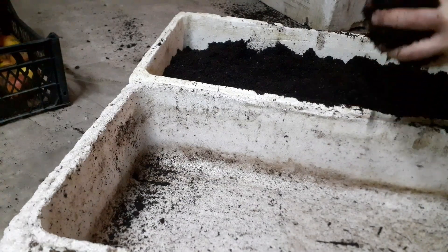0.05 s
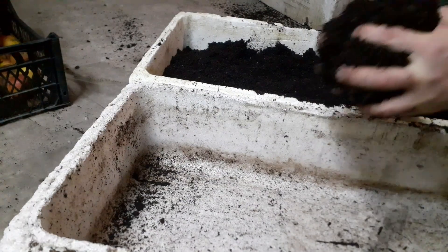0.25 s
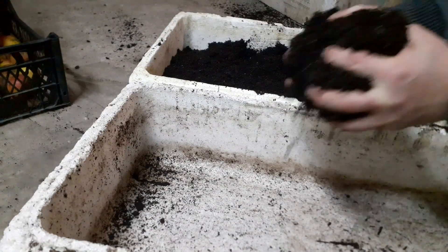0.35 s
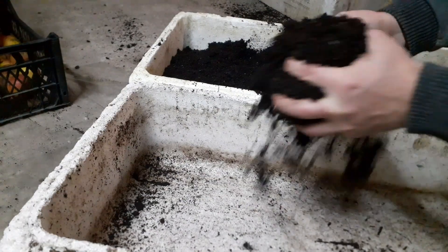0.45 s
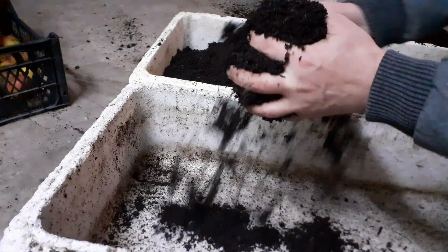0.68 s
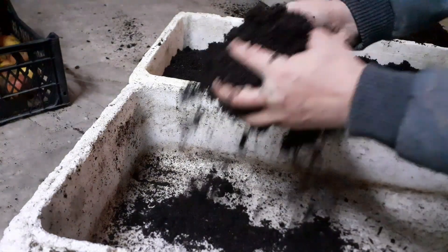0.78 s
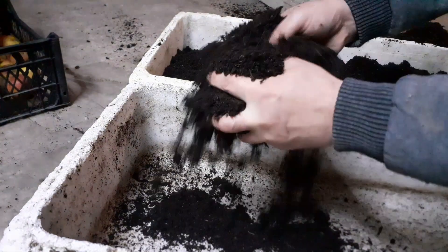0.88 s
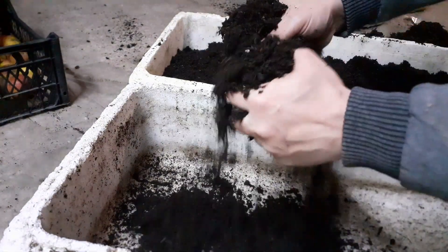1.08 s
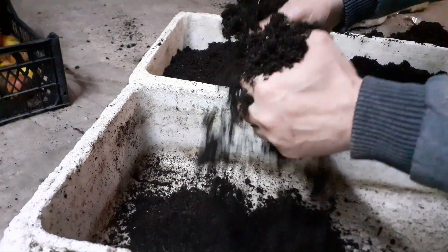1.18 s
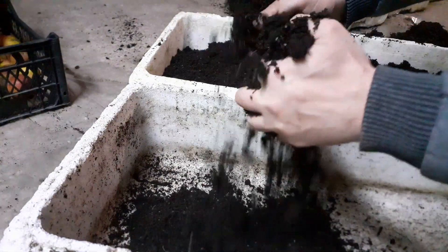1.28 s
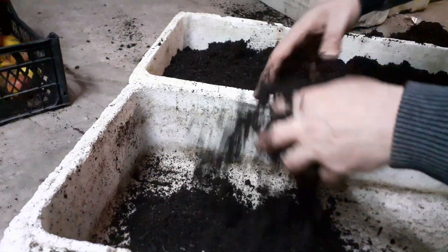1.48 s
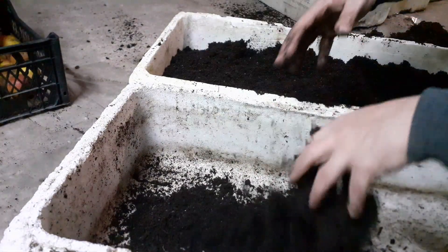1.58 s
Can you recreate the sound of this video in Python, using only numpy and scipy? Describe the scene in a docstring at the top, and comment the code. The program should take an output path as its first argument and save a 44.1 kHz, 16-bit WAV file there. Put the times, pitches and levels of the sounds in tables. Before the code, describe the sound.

Handfuls of moist crumbly planting fibre drop into an empty foam box with crackly, hollow patter

```python
"""Coir crumbled into a foam box

Handfuls of moist coir are crumbled over an empty foam box in a small room, two microphones close by.
Clumps knock as damped sines on the foam floor, and the box booms and rings in resonances and swelling tones.
A shower of random crumbs patters between them; the scattering fibres hiss as noise made of tiny clicks.
Behind it lie a short room tail and quiet air."""
import sys
import numpy as np
from scipy import signal
from scipy.fft import rfft, irfft, next_fast_len
from scipy.io import wavfile
from scipy.ndimage import uniform_filter1d, map_coordinates

SR = 44100
rng = np.random.default_rng(int(sys.argv[2]) if len(sys.argv) > 2 else 0)


def voltage_ratio(level):
    """Linear amplitude factor for a level in decibels (scalar or array-like)."""
    return 10 ** (np.asarray(level, float) / 20)


def materialize(psi):
    """Save the field psi as 16-bit PCM at rate SR to the path in sys.argv[1].

    A 1-D psi becomes a single channel; in a 2-D psi each row is a channel.
    """
    bounded = np.clip(np.atleast_2d(psi).T, -1, 1)
    quanta = np.round(bounded * 32767).astype(np.int16)
    wavfile.write(sys.argv[1], SR, quanta)


N = 72765  # length in samples

CONTACT_S, BREAKUP_S = 0.0015, 0.0044  # delay of the knock, spread of the pieces after it
KNOCK_CYCLES, COVER_PER_S = 9.25, 0.4  # cycles to fall 60 dB at 0 s; the growing bed of coir shortens them
KNOCK_DB, PIECE_DB, PIECE_PITCH = -4.5, -16, 0.3  # pitch spread in log units
PUSH_LAG_S, BOOM_DB = 0.002805, 31.5
SCATTER_LEAD_S, SCATTER_RISE_S, SCATTER_T60_S, SCATTER_DB = 0.0029, 0.0051, 0.025, 7.5
# Clumps landing on the floor of the box. Each row: start in seconds, relative level in dB, knock pitch in Hz,
# push on the box relative to that level in dB, fibre hiss relative to it in dB.
CLUMP_LANDINGS = [(0.018, -56, 1490, -35, 8), (0.039, -54, 990, 3, -30), (0.048, -37.5, 1490, -10, -13),
                  (0.06, -45.5, 667, -21, 2), (0.108, -50, 790, 1, 2.5), (0.171, -46, 1840, -21, -3.5),
                  (0.198, -53.5, 1150, -26, -2.5), (0.217, -21.5, 1040, -17, -28),
                  (0.222, -20.5, 840, -36, -27), (0.228, -30, 2530, 6.5, -8), (0.305, -26.5, 714, -6, -21),
                  (0.314, -24, 860, 10, -12), (0.342, -22.5, 1930, 4, -9.5), (0.361, -22, 865, -12, -14),
                  (0.388, -26.5, 1980, -22, -11), (0.408, -27, 815, -6, -13.5),
                  (0.422, -30, 2620, -10, -9.5), (0.433, -34.5, 2000, -16, -7.5),
                  (0.468, -20.5, 2690, -17, -20.5), (0.469, -22, 1350, -31, -30),
                  (0.502, -19, 1090, -23, -19.5), (0.533, -27, 1870, -27, -15),
                  (0.545, -28, 2850, -19, -10), (0.549, -20.5, 1020, -9, -21), (0.572, -25, 657, 5, -11),
                  (0.581, -14.5, 740, -28, -37), (0.59, -15, 970, 4.5, -40), (0.598, -21.5, 746, 8, -33),
                  (0.614, -11.5, 770, -2.5, -44), (0.629, -19.5, 745, -21, -17.5),
                  (0.655, -12, 1030, -7.5, -19.5), (0.69, -20, 840, 4.5, -4), (0.718, -25.5, 920, -10, -4),
                  (0.743, -12, 1050, -17, -21), (0.755, -6.5, 1080, -7, -45), (0.761, -29, 1560, -26, 4),
                  (0.781, -21.5, 556, -4, -12), (0.79, -18.5, 1110, -22, -18), (0.848, -11, 820, -8, -34),
                  (0.864, -28, 600, 1, -15), (0.899, -14, 950, -34, -21), (0.912, -23, 856, -11, -23),
                  (0.951, -22, 680, -14, -9.5), (0.964, -43, 720, 5.5, -35), (1.056, -13, 1090, -17, -25),
                  (1.065, -20, 1520, -27, -13), (1.102, -14, 1200, -7, -28),
                  (1.135, -17.5, 910, -19, -12.5), (1.158, -10.5, 1160, -25, -27.5),
                  (1.201, -23.5, 1010, 2, -19), (1.223, -27, 1460, -20, -16.5),
                  (1.23, -16.5, 1220, -32, -34), (1.239, -19, 1230, -24, -24), (1.253, -28, 942, -6, -25),
                  (1.279, -13.5, 1090, -19, -26.5), (1.287, -29, 1220, -29, -29),
                  (1.307, -16.5, 900, -31, -20), (1.323, -16.5, 1060, -4.5, -19),
                  (1.345, -14, 1300, -11.5, -24), (1.361, -23, 1200, -3, -10.5), (1.376, -31, 587, 8.5, -6),
                  (1.433, -30.5, 566, -7, -6), (1.453, -32, 1180, -14, -17), (1.507, -30, 1940, -3, -18.5),
                  (1.548, -55, 800, -10, -13), (1.565, -31, 984, -7, -43), (1.604, -46.5, 1170, -5, 1),
                  (1.62, -46, 947, -18, 1.5)]


def clumps():
    """Each clump knocks, breaks into four weaker pieces, pushes the box and sprays fibres."""
    s, db, hz, boom_db, hiss_db = np.transpose(CLUMP_LANDINGS)
    s = s + CONTACT_S
    r = rng.standard_normal((len(s), 4, 5))
    place = np.tanh(r[:, 0, 0])
    cycles = KNOCK_CYCLES * np.exp(-COVER_PER_S * s)[:, None]
    knock = grains(s, hz, db + KNOCK_DB, cycles, place)
    for k in range(1, 5):
        piece_s = s + BREAKUP_S * abs(r[:, 1, k])
        piece_hz = np.clip(hz * np.exp(PIECE_PITCH * r[:, 2, k]), 300, 6000)
        piece_db = db + PIECE_DB + 3 * r[:, 3, k]
        knock = knock + grains(piece_s, piece_hz, piece_db, cycles, np.tanh(r[:, 0, k]))
    knock = foam(knock)

    push, spray = np.zeros(N), np.zeros(N)
    np.add.at(push, ((s + PUSH_LAG_S) * SR).astype(int), voltage_ratio(db + boom_db + BOOM_DB))
    # the spray is a power, hence the doubled dB
    np.add.at(spray, ((s - SCATTER_LEAD_S) * SR).astype(int), voltage_ratio(2 * (db + hiss_db + SCATTER_DB)))
    t = np.arange(SR // 8) / SR
    shape = (1 - np.exp(-t / SCATTER_RISE_S)) * voltage_ratio(-120 * t / SCATTER_T60_S)
    spray_level = np.sqrt(abs(signal.fftconvolve(spray, shape)[:N]))
    return knock + box(push), spray_level * fizz(count=1500, spiky_db=3.0)


SPREAD_S, PAN_DB = 0.00008, 2.5  # most shift either way at each microphone
SAG_CYCLES = 0.35  # extra phase in cycles gained while the pitch sags


def grains(s, hz, db, cycles, place, size=500):
    """Damped sines whose pitch sags as the contact spreads; place (-1..1) sets time and level per microphone."""
    out = []
    for ear in (1, -1):
        at = (s + ear * place * SPREAD_S + 0.001) * SR  # 1 ms of margin, cut off below
        k = np.arange(size) + at.astype(int)[:, None]
        t = np.maximum(k - at[:, None], 0) / SR * hz[:, None]  # time in cycles
        level = voltage_ratio(db[:, None] + ear * PAN_DB * place[:, None] - 60 * t / cycles)
        wave = level * np.sin(2 * np.pi * (t + SAG_CYCLES * (1 - np.exp(-t))))
        out.append(np.bincount(k.ravel(), wave.ravel(), N + SR)[SR // 1000:][:N])
    return np.array(out)


FOAM_DB, FOAM_LOW_HZ = -6.5, 416  # resonance trim, low cut
# The foam floor under small hits. Each row: centre in Hz, width in Hz, relative level in dB.
FOAM_PEAKS = [(623, 110, 7), (740, 11, 4), (793, 300, 6), (1180, 74, 4), (1156, 240, 5), (1560, 330, -11),
              (2040, 220, 11.5)]


def foam(x):
    """Small hits ring the foam floor, which radiates little bass."""
    ring = resonances(FOAM_PEAKS)
    low_cut = highpass(FOAM_LOW_HZ, order=3)
    return filtered(x, lambda f: (1 + voltage_ratio(FOAM_DB) * ring(f)) * low_cut(f))


PUSH_S = 0.0017  # softness of a push; longer is duller
# The whole box booming. Each row: centre in Hz, width in Hz, relative level in dB.
BOX_PEAKS = [(152, 77, -5.5), (201.3, 40.5, 0.5), (288.4, 9.8, 8), (360, 16.2, 2.5), (420, 9.5, -1.5)]


def box(push):
    """The resonances of the whole box, driven through a soft two-stage low-pass."""
    ring = resonances(BOX_PEAKS)
    return filtered(push, lambda f: ring(f) / (1 + 1j * f * PUSH_S) ** 2)


WALL_HZ, WALL_RISE_S, WALL_T60_S = (298.6, 355.8), 0.0031, 0.085
HIGH_WALL_HZ, HIGH_WALL_DB, HIGH_WALL_T60_S = 735, -18, 0.13  # dB: the high tone under each wall boom
# Landings that set the two wall tones ringing. Each row: start in seconds, level in dB,
# share of power in the upper tone from 0 to 1.
WALL_BOOMS = [(0.052, -45, 0.2), (0.088, -47.5, 1), (0.102, -43.5, 0.94), (0.228, -29, 0.74),
              (0.253, -34.5, 0.83), (0.312, -33.5, 0.2), (0.324, -28, 0.93), (0.357, -27.5, 1),
              (0.421, -30, 0.75), (0.444, -36, 0.37), (0.504, -39.5, 0), (0.554, -32, 0.35),
              (0.576, -17, 0.35), (0.597, -13, 0.2), (0.619, -17, 0.35), (0.646, -22.5, 0.4),
              (0.708, -16, 0.49), (0.745, -21, 0.4), (0.758, -20.5, 0.9), (0.784, -18.5, 0.02),
              (0.853, -17.5, 0.66), (0.9, -25, 1), (0.924, -36, 0), (0.952, -16.5, 0), (0.963, -19, 0),
              (1.085, -42, 0.5), (1.101, -23, 0), (1.136, -21, 0.03), (1.164, -30, 0.6), (1.205, -31, 0.2),
              (1.243, -31, 0.04), (1.279, -32, 0.5), (1.31, -26.5, 0.98), (1.343, -26.5, 0),
              (1.434, -55, 0.7), (1.515, -40, 0.53), (1.563, -47, 0.9), (1.619, -41, 0.1)]
# Landings near a wall that ring its high tone. Each row: start in seconds, level in dB.
HIGH_WALL_RINGS = [(0.064, -46), (0.236, -38.5), (0.262, -40), (0.316, -34.5), (0.578, -19), (0.66, -38),
                   (0.952, -32)]


def wall_tones():
    """Landings split their power between two wall tones and sound a weaker high one."""
    s, db, share = np.transpose(WALL_BOOMS)
    share = np.clip(share, 0.02, 0.98)
    walls = ringing(s, db + HIGH_WALL_DB, HIGH_WALL_HZ, WALL_RISE_S, HIGH_WALL_T60_S)
    for hz, part in zip(WALL_HZ, (1 - share, share)):
        walls = walls + ringing(s, db + 10 * np.log10(part), hz, WALL_RISE_S, WALL_T60_S)
    near_s, near_db = np.transpose(HIGH_WALL_RINGS)
    return walls + ringing(near_s, near_db, HIGH_WALL_HZ, WALL_RISE_S, HIGH_WALL_T60_S)


DEEP_HZ, DEEP_RISE_S, DEEP_T60_S = 114, 0.014, 0.18
# Heavy landings that shake the whole floor of the box. Each row: start in seconds, level in dB.
FLOOR_THUDS = [(0.078, -59.5), (0.22, -69), (0.318, -38), (0.386, -48.5), (0.491, -55), (0.586, -53),
               (0.616, -38), (0.701, -27), (0.744, -22), (0.799, -32.5), (0.853, -41), (0.957, -20.5),
               (0.994, -25.5), (1.094, -25.5), (1.128, -42), (1.199, -38), (1.292, -39), (1.363, -28),
               (1.48, -37.5), (1.561, -32.5), (1.61, -48)]


def floor_thuds():
    """The whole floor swells slowly into one deep tone under each heavy landing."""
    s, db = np.transpose(FLOOR_THUDS)
    return ringing(s, db, DEEP_HZ, DEEP_RISE_S, DEEP_T60_S)


DETUNE = 0.03  # random pitch spread in log units
WANDER_DB, WANDER_PER_CYCLE = 4, 0.3  # slow random wander of the ringing level


def ringing(s, db, hz, rise_s, t60_s):
    """One tone swelling and dying after each landing, each with a small random detuning."""
    t = np.maximum(np.arange(N) / SR - s[:, None], 0)
    phase = 2 * np.pi * rng.random((len(s), 1))
    tune = np.exp(DETUNE * rng.standard_normal((len(s), 1)))
    knots = np.arange(N) / SR * hz * WANDER_PER_CYCLE
    wander = map_coordinates(rng.standard_normal(int(knots[-1]) + 4), [knots])
    level = voltage_ratio(db[:, None] - 60 * t / t60_s) * (1 - np.exp(-t / rise_s))
    tones = level * np.sin(2 * np.pi * tune * hz * t + phase)
    return voltage_ratio(WANDER_DB * wander) * np.sum(tones, 0)


CRUMB_HZ, CRUMB_PITCH, CRUMB_CYCLES = 1020, 0.51, 5  # middle pitch, log spread, cycles to fall 60 dB
CRUMB_SIZE_DB = 3.5  # spread of crumb levels
PATTER_DB, RUMBLE_DB, HISS_DB = -5, -4, -0.5  # trims of the three layers
# The crumb shower, drawn as lines between rows. Each row: time in seconds, then the relative levels in dB
# of the patter, the box hum and the fibre hiss.
SHOWER_LEVELS = [(0.0,-69,-76,-79), (0.068,-50.5,-60.5,-55), (0.149,-66,-82,-80), (0.206,-63,-65,-47.5),
                 (0.22,-32,-72,-78), (0.227,-60,-69,-47), (0.238,-44,-56,-56), (0.3,-66,-44.5,-55.5),
                 (0.316,-32,-42,-48.5), (0.464,-46.5,-47.5,-52), (0.556,-35,-63,-49), (0.579,-18,-40,-31),
                 (0.634,-25,-29,-36), (0.735,-30,-30,-36), (0.757,-18.5,-32,-33.5), (0.77,-25,-25,-35),
                 (0.84,-43,-35.5,-44), (0.848,-30,-20,-39), (0.864,-31,-44,-41), (0.941,-34.5,-38,-42.5),
                 (0.95,-26,-38.5,-34), (1.022,-48,-38.5,-53), (1.051,-37,-39,-43.5), (1.063,-25.5,-37,-43),
                 (1.079,-36.5,-26.5,-39.5), (1.116,-32,-44,-36), (1.167,-28.5,-33.5,-41),
                 (1.191,-48,-31,-51.5), (1.238,-37,-42,-52), (1.271,-45.5,-51,-56), (1.284,-34.5,-64,-42),
                 (1.399,-40.5,-44,-48.5), (1.47,-56,-48.5,-56), (1.534,-48.5,-60,-55), (1.56,-52,-40,-49),
                 (1.569,-37.5,-36.5,-40), (1.586,-50,-43.5,-57), (1.65,-52,-45,-44.5)]


def shower(count=1700):
    """Random crumbs patter on the foam, noise keeps the box humming and fibres hiss."""
    at, *columns = np.transpose(SHOWER_LEVELS)
    patter_db, hum_db, hiss_db = [np.interp(np.arange(N) / SR, at, c) for c in columns]
    r, u = rng.standard_normal((count, 2)), rng.random((count, 2))
    crumb_s = u[:, 0] * N / SR
    crumb_hz = np.clip(CRUMB_HZ * np.exp(CRUMB_PITCH * r[:, 0]), 300, 9000)
    crumb_db = -CRUMB_SIZE_DB * np.log(u[:, 1] + 0.033)  # many small, few large
    crumbs = grains(crumb_s, crumb_hz, crumb_db, CRUMB_CYCLES, np.tanh(r[:, 1]))
    patter = voltage_ratio(patter_db + PATTER_DB) * unit(foam(crumbs))
    hum = voltage_ratio(hum_db + RUMBLE_DB) * unit(box(rng.standard_normal(N)))
    return patter + hum, voltage_ratio(hiss_db + HISS_DB) * fizz(count=900, spiky_db=1.5)


UNALIKE_HZ = 3740  # the two microphones grow apart up to here
# Colour of the fibre hiss. Each row: frequency in Hz, relative density in dB per Hz.
FIBRE_COLOUR = [(300, -47), (1180, 0.5), (2000, -5.5), (3910, -8), (4340, -8.5), (7440, -14.5),
                (11900, -15.5), (15200, -18), (16000, -28)]


def fizz(count, spiky_db, patchy_db=3):
    """Stereo hiss of rms 1 from very many tiny clicks of uneven size and colour, alike only low down."""
    size = map_coordinates(rng.standard_normal(count + 4), [np.arange(N) * count / N])
    clicks = voltage_ratio(spiky_db * size) * rng.standard_normal((2, N))
    z = signal.stft(clicks, nperseg=128)[2]
    field = uniform_filter1d(rng.standard_normal(z.shape[1:]), size=14, axis=0)
    field = uniform_filter1d(field, size=5, axis=1)
    pair = signal.istft(z * voltage_ratio(patchy_db * unit(field)), nperseg=128)[1][:, :N]

    def colour_and_width(hz):
        turn = np.pi / 4 * np.clip(hz / UNALIKE_HZ, 0, 1)
        return voltage_ratio(along(FIBRE_COLOUR, hz)) * [np.cos(turn), np.sin(turn)]

    mid, side = filtered(pair, colour_and_width)
    return unit(np.array([mid + side, mid - side]))


# Decay of the small room. Each row: frequency in Hz, time to fall 60 dB in seconds.
ROOM_DECAY = [(200, 0.21), (2000, 0.21), (10000, 0.2)]


def room(x):
    """A short tail of decaying noise, different at each microphone."""
    hz, t, z = signal.stft(rng.standard_normal((2, SR // 3)), SR, nperseg=256)
    fade = voltage_ratio(-60 * t / along(ROOM_DECAY, hz)[:, None])
    tail = signal.istft(z * fade, SR, nperseg=256)[1]
    late = np.pad(x, ((0, 0), (150, 0)))  # samples before the tail begins
    return signal.fftconvolve(late, tail / np.linalg.norm(tail[0]), axes=1)[:, :N]


# Colour of the quiet air in the room. Each row: frequency in Hz, relative density in dB per Hz.
AIR_COLOUR = [(24, -41), (40, -35), (312, 3), (1340, -3), (1720, 20), (2000, 1.5), (12100, 2), (16000, 5)]


def air():
    """Steady coloured noise of rms 1, independent at each microphone."""
    return unit(filtered(rng.standard_normal((2, N)), lambda hz: voltage_ratio(along(AIR_COLOUR, hz))))


def resonances(table):
    """Causal response of a set of (Hz, width, dB) peaks with alternating signs."""
    def response(f):
        total = 0
        for k, (centre, width, db) in enumerate(table):
            drag = 1j * f * width
            total = total + (-1) ** k * voltage_ratio(db) * drag / (centre * centre - f * f + drag)
        return total
    return response


def highpass(hz, order):
    """Causal low cut of equal first-order stages, each with its corner at hz / 2."""
    return lambda f: (1j * f / (hz / 2 + 1j * f)) ** order


def filtered(x, response):
    """x times a complex response of frequency."""
    m = next_fast_len(N + SR // 2)
    return irfft(rfft(x, m) * response(np.fft.rfftfreq(m, 1 / SR)), m)[..., :N]


def along(points, hz):
    """(Hz, value) points joined on a log frequency axis."""
    f, v = np.transpose(points)
    return np.interp(np.log(hz + 1), np.log(f + 1), v)


def unit(x):
    """Scaled to rms 1."""
    return x / np.sqrt(np.mean(x ** 2) + 1e-20)


WET_DB, AIR_DB = -12, -66.5


def scene():
    """Clumps, box tones, crumbs and fibres, with the room and its quiet air."""
    hits, spray = clumps()
    tones = wall_tones() + floor_thuds()
    patter, hiss = shower()
    coir = hits + tones + patter + spray + hiss
    return coir + voltage_ratio(WET_DB) * room(coir) + voltage_ratio(AIR_DB) * air()


def band_limit(x):
    """A steep low-pass at the top of the band."""
    return signal.sosfilt(signal.butter(12, 16620, fs=SR, output="sos"), x)


MIC_LOW_HZ, TOP_HZ = 73, 15900
# Balance of the two microphones. Each row: frequency in Hz, left over right in dB.
MIC_BALANCE = [(100, -3.5), (700, -3.5), (4400, -2), (15000, 1)]


def record(dry):
    """The microphones cut deep bass, the left one hears the box a little less; the format stops at TOP_HZ."""
    low_cut = highpass(MIC_LOW_HZ, order=4)

    def response(hz):
        balance = voltage_ratio(np.array([[0.5], [-0.5]]) * along(MIC_BALANCE, hz))
        return balance * low_cut(hz) * (hz < TOP_HZ)

    return band_limit(filtered(dry, response))


dry = scene()
out = record(dry)
materialize(out)
```